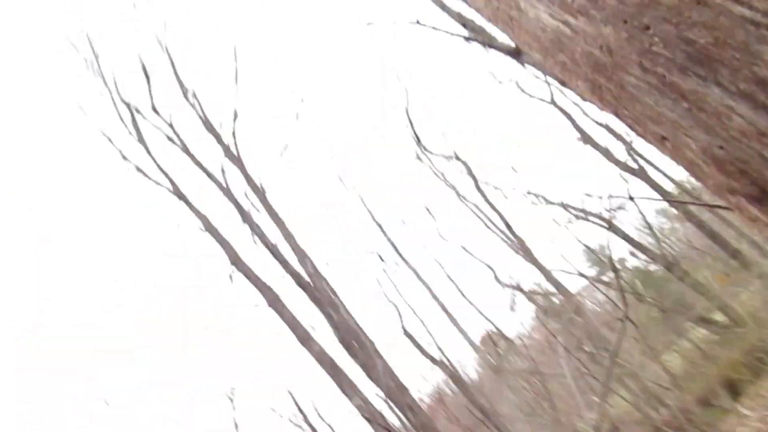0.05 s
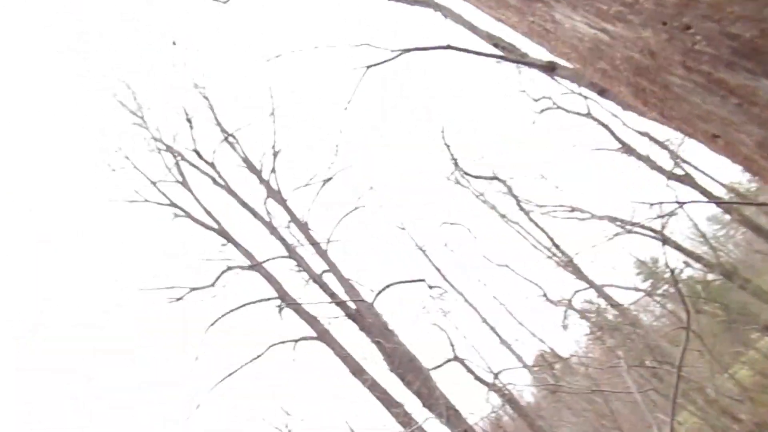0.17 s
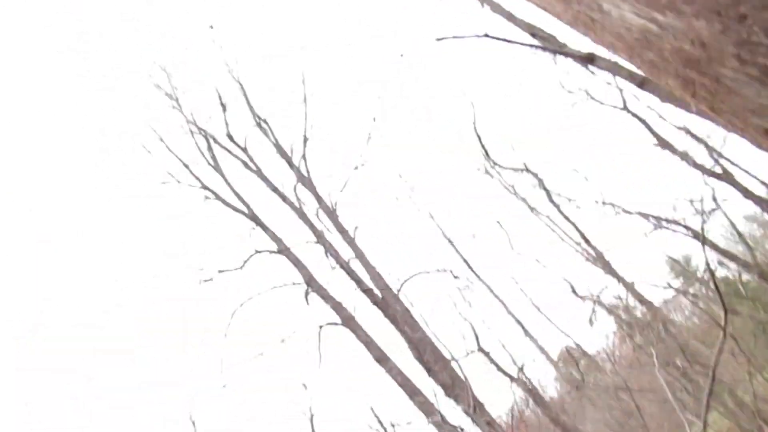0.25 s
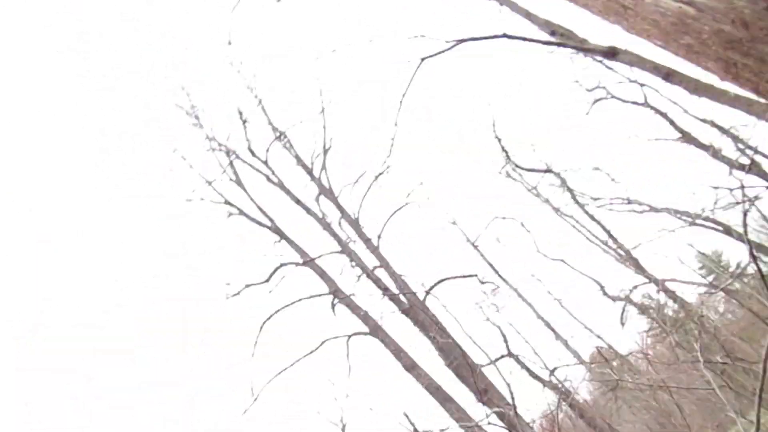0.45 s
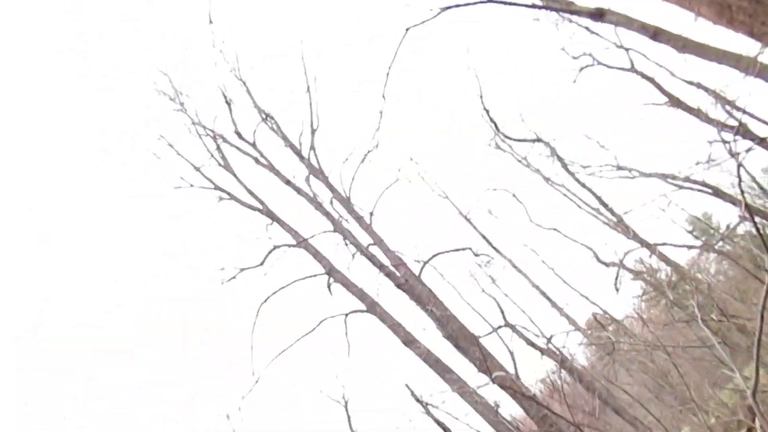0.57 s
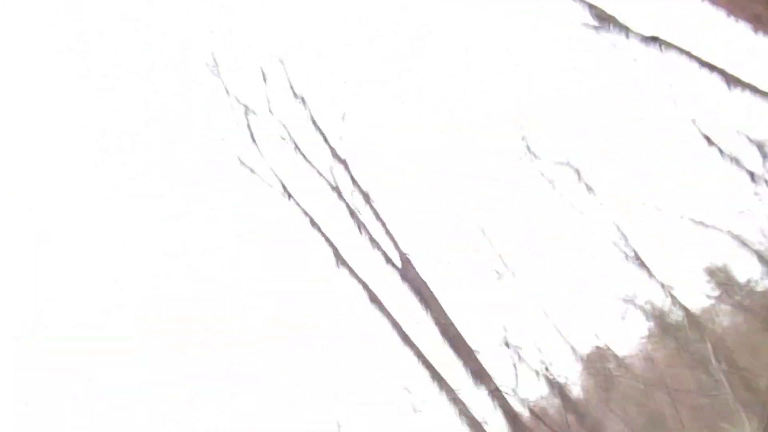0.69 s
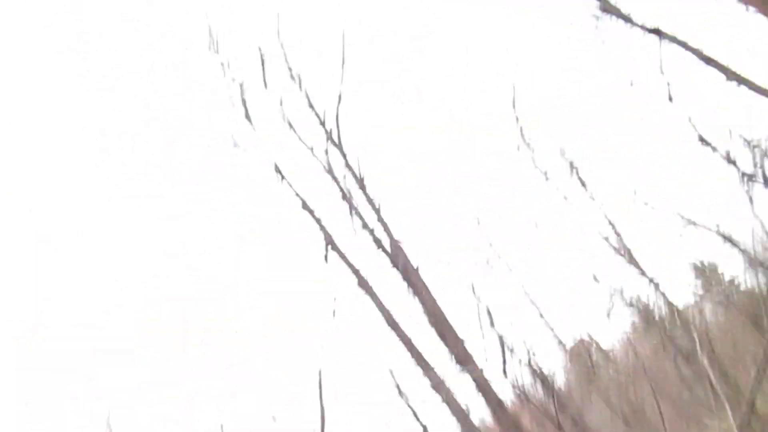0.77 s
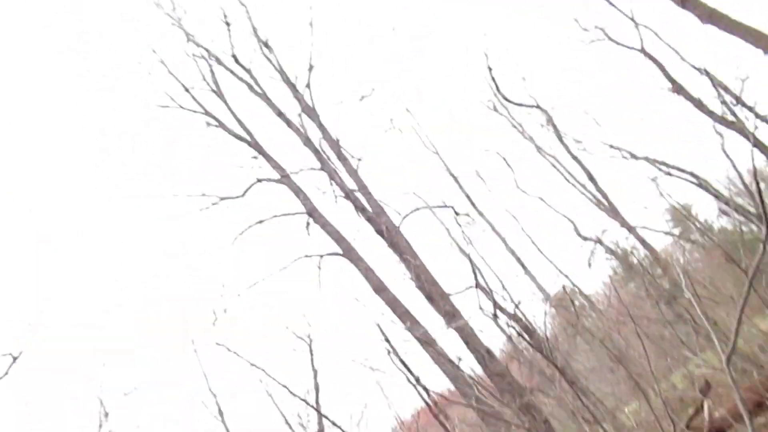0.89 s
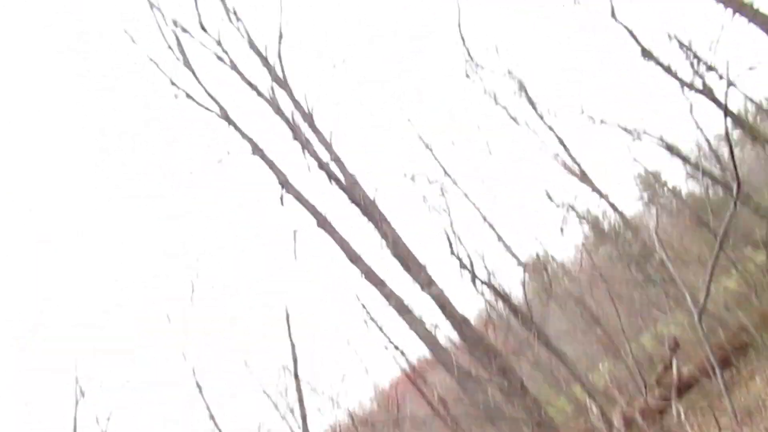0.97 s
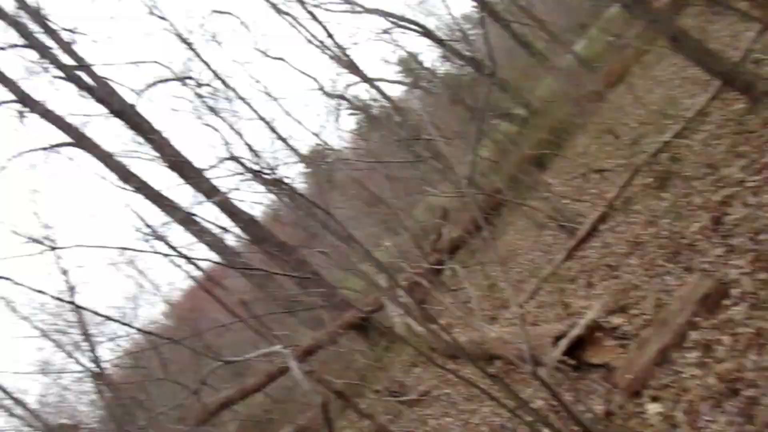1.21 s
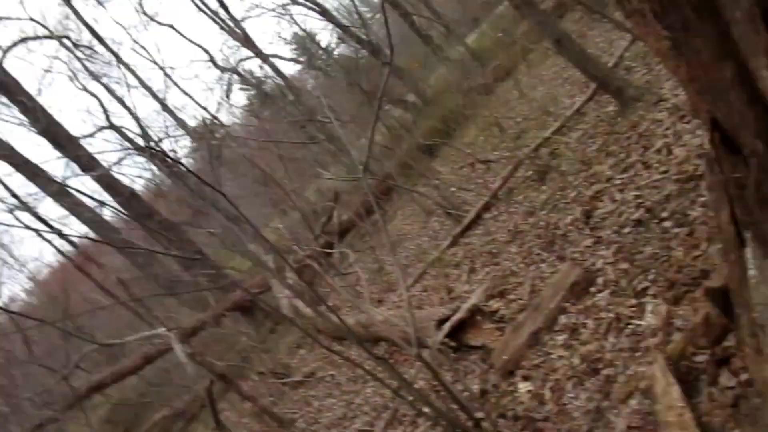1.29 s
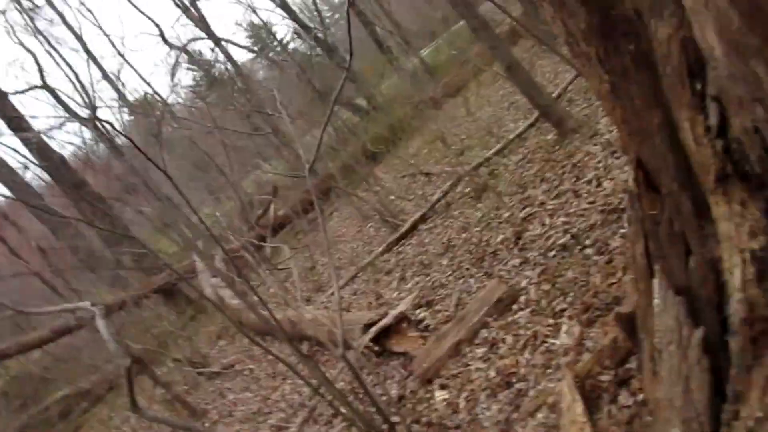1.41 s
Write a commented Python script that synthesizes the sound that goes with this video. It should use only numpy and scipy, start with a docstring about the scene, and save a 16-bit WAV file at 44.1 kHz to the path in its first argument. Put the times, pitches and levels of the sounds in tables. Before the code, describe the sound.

Heavy footsteps crunch through dry leaves in the woods, close by. The first step thumps down from about 0.2 seconds with a cluster of twig snaps, peaking in one very sharp crack at 0.4. Two lighter steps follow near 0.7 and 1.0 seconds, each with a thud, bright snaps and a brief crackle. Soft leaf swishing and low microphone rumble continue until about 1.4 seconds.

```python
"""Three heavy steps through dry leaves on a woodland floor, heard from a hand-held camera.
Each step thumps, snaps a few twigs and crushes leaves that crackle on for a moment. Every crack
has the same short bright ring near 3 kHz, probably the camera body resonating.
Leaves swish between the steps, sliding surfaces squeak and the trunks echo faintly.
The moving microphone rumbles, and the hardest crack overloads it."""
import sys
import numpy as np
from scipy import signal
from scipy.fft import rfft, irfft, next_fast_len
from scipy.io import wavfile

SR = 44100
rng = np.random.default_rng(int(sys.argv[2]) if len(sys.argv) > 2 else 0)


def pcm_store(signal):
    """Save signal as 16-bit PCM."""
    levels = np.round(np.clip(np.atleast_2d(signal), -1, 1) * 32767)
    wavfile.write(sys.argv[1], SR, levels.astype(np.int16).T)


N = 63945
TOP_HZ = 15000


def twig_snaps():
    """Fibres tear in a brief burst, the twig knocks on the ground, and a bright ring follows."""
    # snaps: t/s, snap/dB, tilt/(dB per octave), decay/s, ring/dB, knock/dB, twig's own note/Hz
    cracks = [(0.0466, -25.5, -14.5, 0.00077, -43, -38, 860), (.2375, -30.5, -10, 0.0016, -55, -19.5, 1350),
              (0.2604, -21, 6.5, 0.00065, -32.5, -25, 4920), (0.3571, -14, -1, .0007, -27, -11.5, 7100),
              (0.367, -25, 3, 0.00087, -30.5, -21, 1640), (0.3709, -17.5, 0, .0008, -27.5, -30.5, 6200),
              (0.3794, -22, 1, .0015, -33, -25, 5850), (0.3935, 5, -1.03, .0009, -4, -10, 5320),
              (0.4026, -18.5, -.5, .0025, -27, -24.5, 3100), (.4228, -19, -2, .0014, -15.5, -22, 3050),
              (0.426, -25.5, 0.5, .0015, -36, -41.5, 5450), (0.6317, -33, -2.5, 0.0014, -47, -37, 3140),
              (0.6764, -8, -0.9, 0.0014, -12.5, -4, 4240), (.6846, -19, 2.9, 0.0018, -31.5, -23, 13140),
              (.6890, -25.5, -4.5, .003, -28.5, -21.5, 2970), (0.9927, -9, -5.5, 0.0035, -11.5, -18, 2540),
              (0.9972, -16, -2.5, .002, -17, -12, 5720), (1.2199, -37.5, -4.5, 0.0011, -38.5, -31, 3120)]
    # tone of tearing fibres: f/Hz, level/dB
    snap_spectrum = [(150, -10.5), (500, -4), (1200, -1.5), (2000, -1), (3000, -1.5), (3900, -3.5),
                     (6500, -5), (8200, -8.5), (11000, -14.5), (15000, -21)]
    # ring near 3 kHz shared by every crack, probably the camera body: f/Hz, level/dB, t60/s
    ring_modes = [(1588, -6.5, 0.017), (1894, -14, 0.0061), (2320, -7, 0.0077), (2557, -6, .014),
                  (2963, 2, .014), (3240, -6, 0.015), (5000, -20.5, 0.0059), (6620, -14.5, 0.0073)]
    # low knock of the wood: f/Hz, level/dB, t60/s
    knock_modes = [(235, -7, 0.029), (315, -7, 0.03), (399, -4, 0.033), (594.6, -6, 0.032),
                   (793, -7.5, 0.024), (912, -9, 0.024), (1307, -9.5, 0.032)]
    note_db, note_t60_s = -5, 0.0085  # level relative to the snap
    out = np.zeros(N)
    for start, snap_db, tilt_db, decay, ring_db, knock_db, hz in cracks:
        t = since(start)
        scatter = undb(-19.5) * np.exp(-t / 0.0045)  # off the ground nearby
        tear = (t > 0) * (np.exp(-t / decay) + scatter) * rng.choice([-1, 1], N)
        snap = colour(tear, snap_spectrum, tilt_db) + ring(t, [(hz, note_db, note_t60_s)])
        resonance = undb(ring_db) * ring(t, ring_modes) + undb(knock_db) * ring(t, knock_modes)
        out += undb(snap_db) * snap + resonance
    return out


def foot_thumps():
    """The weight of each step lands as short swells of bass."""
    # foot on ground: t/s, f/Hz, level/dB, rise/s
    thumps = [(.226, 51, -19, 0.013), (0.237, 113, -21.5, 0.006), (.2615, 61.6, -10.5, 0.0045),
              (0.348, 120, -17.5, 0.0049), (0.3723, 89.3, -3.5, .006), (0.396, 111.2, -14.5, .005),
              (.428, 95, -31.5, .006), (0.626, 65, -24, 0.0083), (0.638, 170, -26.5, .004),
              (.677, 140, -5.5, 0.0021), (0.684, 54.7, -25, 0.013), (0.9931, 360, -9.5, 0.0034),
              (.997, 65.6, -21, .008), (1.223, 66, -38.5, 0.0085), (1.411, 50, -31, 0.013)]
    out = np.zeros(N)
    for start, hz, db, rise in thumps:
        t = since(start)
        swell = (t / rise * np.exp(1 - t / rise)) ** 1.5
        out += undb(db) * swell * np.sin(2 * np.pi * hz * t)
    return out


def crushed_leaves(rise_s=0.002):
    """Crushed leaves crackle at once and die away; the packed litter under them crunches lower."""
    # presses underfoot: t/s, crackle/dB, decay/s, crunch/dB
    crushes = [(0.233, -60, 0.015, -24), (0.314, -43.5, 0.0027, -44), (0.351, -52, 0.022, -20.5),
               (0.389, -32, 0.016, -24), (0.426, -46.5, 0.0067, -46), (.620, -50, 0.016, -33.5),
               (0.644, -39.5, 0.0051, -51), (0.655, -44.5, 0.011, -42.5), (.680, -32.5, 0.012, -27.5),
               (1.013, -40, 0.0079, -36.5), (1.086, -48, 0.0074, -81), (1.302, -56.5, 0.006, -42),
               (1.362, -42.5, .004, -63)]
    # crisp top leaves: f/Hz, level/dB
    leaf_spectrum = [(150, -7), (500, -6), (1500, -1.5), (3000, -2), (6000, -2), (10000, -9),
                     (15000, -13.5)]
    # dull packed litter: f/Hz, level/dB
    litter_spectrum = [(80, -19.5), (200, -1), (370, 7.5), (700, -9), (2000, -21), (6000, -34)]
    top, below = np.zeros(N), np.zeros(N)
    for start, crackle_db, decay, crunch_db in crushes:
        t = since(start)
        press = (1 - np.exp(-t / rise_s)) * np.exp(-t / decay)
        top += undb(crackle_db) * press
        below += undb(crunch_db) * press
    crisp = colour(top * crackle(per_s=830, spread_db=4), leaf_spectrum)
    crunch = colour(below * grains(per_s=4500, spread_db=2.5), litter_spectrum)
    return crisp + crunch


def stick_knocks(decay_s=0.0042):
    """Sticks pressed into the litter give a dull knock."""
    # soft knocks: t/s, level/dB
    knocks = [(0.06, -33), (0.86, -41.5), (.982, -29.5), (1.156, -44)]
    # tone of a pressed stick: f/Hz, level/dB
    stick_spectrum = [(200, -4.5), (700, 0), (1400, -12.5), (4000, -27.5), (12000, -44)]
    press = np.zeros(N)
    for start, db in knocks:
        t = since(start)
        press += undb(db) * (t > 0) * np.exp(-t / decay_s)
    return colour(press * rng.choice([-1, 1], N), stick_spectrum)


def swish_and_rumble(split_hz=3240):
    """Leaves brush past with a fine crackle on top, over the rumble of the moving microphone."""
    # fader moves, ahead of the trims below: t/s, swish body/dB, swish treble/dB, rumble/dB
    motion = [(0, -41, -49.5, -37.5), (.065, -41, -47.5, -32.5), (0.089, -46, -47, -48),
              (.12, -47, -57, -42), (.20, -49, -57, -47.5), (0.321, -47.5, -64.5, -35),
              (0.441, -51, -51.5, -38.5), (.465, -66, -73.5, -55), (.53, -64.5, -74.5, -59.5),
              (.605, -61, -57.5, -57.5), (0.711, -49, -64.5, -42.5), (0.746, -63, -69, -54.5),
              (.78, -60, -68, -63), (.87, -57, -59.5, -53.5), (.915, -56.5, -52, -67),
              (.97, -50.5, -59.5, -50), (1.028, -50.5, -52.5, -43), (1.088, -56.5, -63, -54.5),
              (1.25, -53.5, -59, -68), (1.309, -57.5, -67.5, -43.5), (1.40, -59, -66, -61),
              (1.418, -55, -55.5, -47)]
    # brushing leaves: f/Hz, level/dB
    swish_spectrum = [(150, 2), (350, -5), (900, -9), (1800, -15.5), (3000, -16), (5000, -15),
                      (7500, -21.5), (11000, -23.5), (15000, -29)]
    # handling noise: f/Hz, level/dB
    rumble_spectrum = [(15, -4), (30, 0), (60, 4), (110, -4), (170, -8), (250, -18), (400, -45)]
    times, body_db, treble_db, rumble_db = np.array(motion).T
    fader = lambda db: undb(np.interp(np.arange(N) / SR, times, db))
    rub = colour(grains(per_s=6600, spread_db=3.5), swish_spectrum)
    fizz = colour(crackle(per_s=1700, spread_db=2.5), swish_spectrum)
    body = unit(bandpass(rub, [230, split_hz], order=4))
    treble = unit(bandpass(fizz, [split_hz, TOP_HZ], order=4))
    rumble = colour(rng.standard_normal(N), rumble_spectrum)
    return body * fader(body_db - 1) + treble * fader(treble_db - 2) + rumble * fader(rumble_db + 2)


def squeaks(jitter_hz=500):
    """Sliding surfaces give thin whistles that glide and settle."""
    # glides: t/s, length/s, from/Hz, to/Hz, level/dB
    glides = [(0.064, 0.032, 7600, 8000, -51.5), (0.14, 0.03, 9150, 10570, -59),
              (.195, 0.011, 5020, 4580, -53)]
    out = np.zeros(N)
    for start, length, from_hz, to_hz, db in glides:
        progress = np.minimum(since(start) / length, 1)
        hz = to_hz + (from_hz - to_hz) * np.exp(-4 * progress) + jitter_hz * rng.standard_normal(N)
        out += undb(db) * np.sin(np.pi * progress) * np.sin(2 * np.pi * np.cumsum(hz) / SR)
    return out


def trunk_echo(x, t60_s=0.3):
    """Tree trunks throw back a short, diffuse midrange tail."""
    tail = colour(rng.standard_normal(N), [(100, -4), (1000, 6), (4000, -12), (15000, -20)])
    tail *= undb(-60 * since(0) / t60_s)
    return signal.fftconvolve(x, tail / np.linalg.norm(tail))[:N]


def grains(per_s, spread_db):
    """Dense tiny clicks of very unequal size."""
    size = undb(spread_db * np.minimum(rng.exponential(size=N), 4))
    return unit((rng.random(N) < per_s / SR) * size * rng.choice([-1, 1], N))


def crackle(per_s, spread_db):
    """Grains of many pitches: every band has its own clicks, flat in sum."""
    # band edges: f/Hz
    edges = [60, 900, 2200, 4000, 6500, 10000, 16000]
    return sum(bandpass(grains(per_s, spread_db), band, order=2) for band in zip(edges, edges[1:]))


def ring(t, modes):
    """Damped modes of alternating polarity, struck at t = 0."""
    return sum((-1) ** k * undb(db - 60 * t / t60) * np.sin(2 * np.pi * hz * t)
               for k, (hz, db, t60) in enumerate(modes))


def colour(x, points, tilt_db=0):
    """EQ of unit power gain through (f/Hz, level/dB) points, tilted per octave above the second."""
    size = next_fast_len(N + SR // 4) * 2
    octave = np.log2(np.maximum(np.fft.rfftfreq(size, 1 / SR), 1))
    hz, db = np.array(points, float).T
    slope_db = tilt_db * np.maximum(octave - np.log2(hz[1]), 0)
    gain = unit(undb(np.interp(octave, np.log2(hz), db) + slope_db))
    # minimum phase, so nothing sounds ahead of an attack
    cepstrum = irfft(np.log(gain))
    cepstrum[1:size // 2] *= 2
    cepstrum[size // 2 + 1:] = 0
    return irfft(rfft(x, size) * np.exp(rfft(cepstrum)))[:N]


def bandpass(x, band_hz, order):
    """Keep one band."""
    return signal.sosfilt(signal.butter(order, band_hz, "band", fs=SR, output="sos"), x)


def since(start):
    """Seconds since a moment, zero before it."""
    return np.maximum(np.arange(N) - round(start * SR), 0) / SR


def undb(db):
    """Decibels to gain."""
    return 10 ** (np.asarray(db) / 20)


def unit(x):
    """Scale to rms 1."""
    return x / np.sqrt(np.mean(x ** 2) + 1e-18)


def scene():
    """Steps close by in mono, with a faint echo of the snaps, knocks and crushed leaves."""
    underfoot = twig_snaps() + stick_knocks() + crushed_leaves()
    echo = undb(-53.5) * trunk_echo(underfoot)
    return (underfoot + echo + foot_thumps() + swish_and_rumble() + squeaks())[None]


def record(dry, drive_db=0.5, ceiling=0.78):
    """Overload flattens the hardest peaks, with a steep high cut before and after."""
    high_cut = signal.ellip(10, .2, 80, TOP_HZ, fs=SR, output="sos")
    driven = signal.sosfilt(high_cut, dry * undb(drive_db))
    clipped = driven / (1 + (driven / ceiling) ** 6) ** (1 / 6)
    return signal.sosfilt(high_cut, clipped)


dry = scene()
out = record(dry)
pcm_store(out)
```